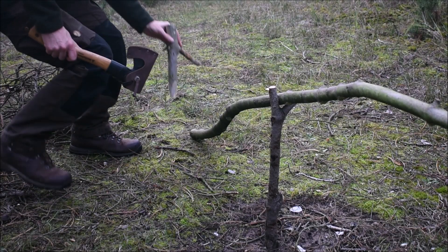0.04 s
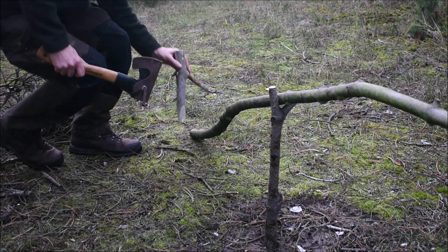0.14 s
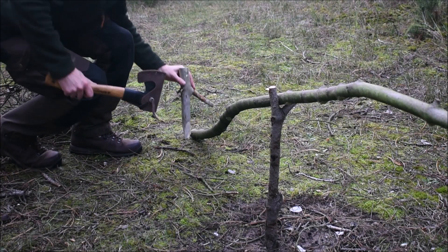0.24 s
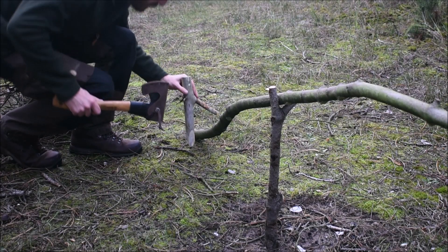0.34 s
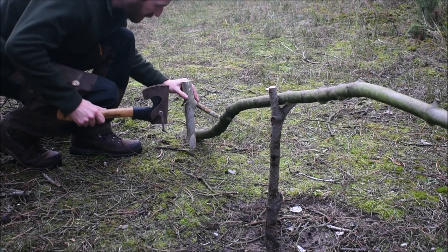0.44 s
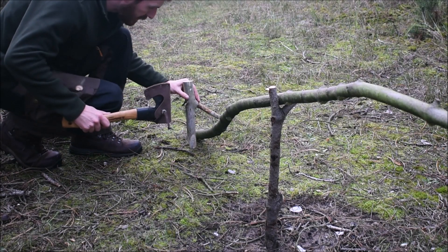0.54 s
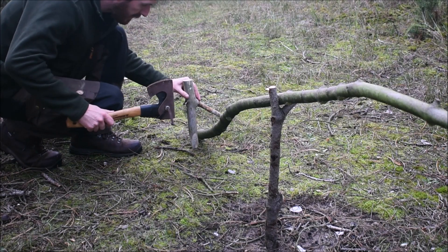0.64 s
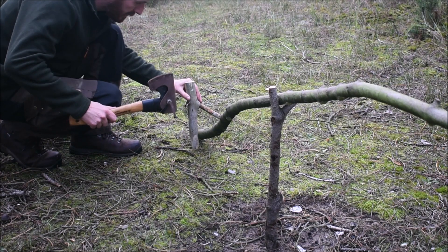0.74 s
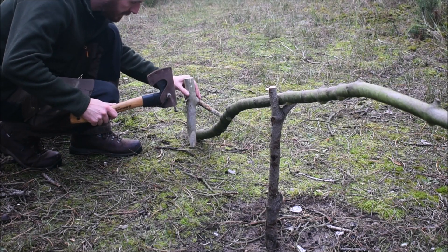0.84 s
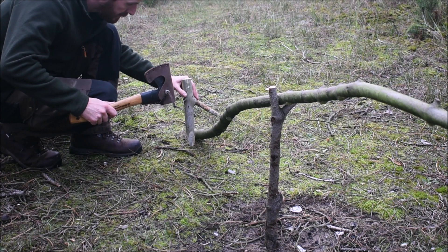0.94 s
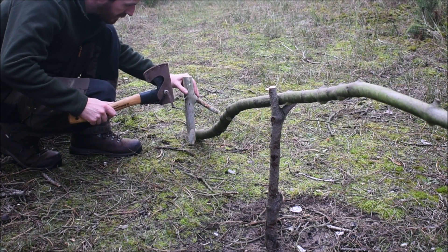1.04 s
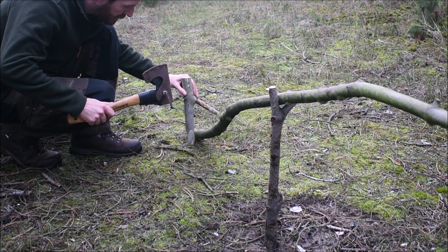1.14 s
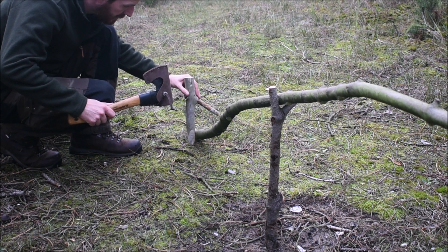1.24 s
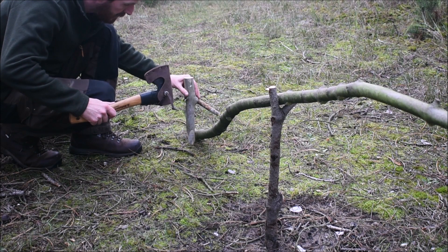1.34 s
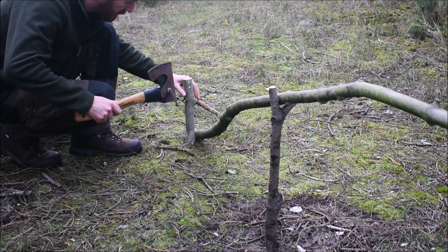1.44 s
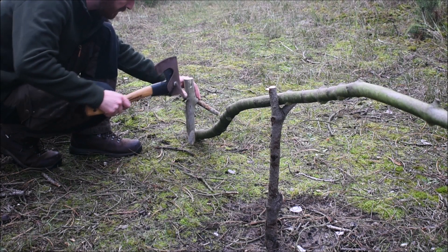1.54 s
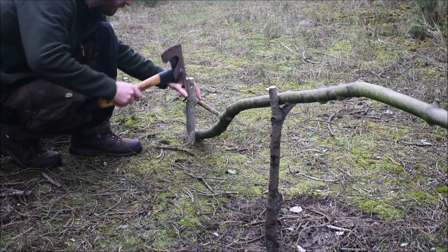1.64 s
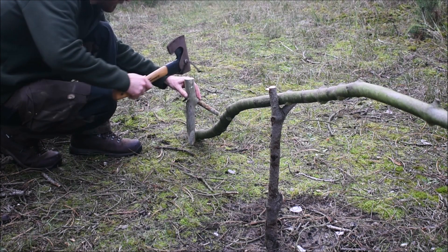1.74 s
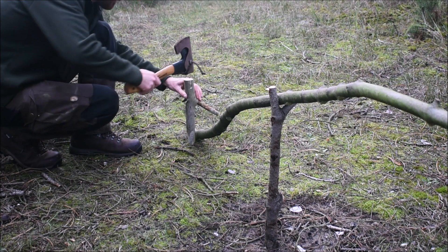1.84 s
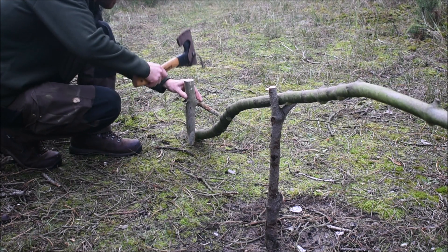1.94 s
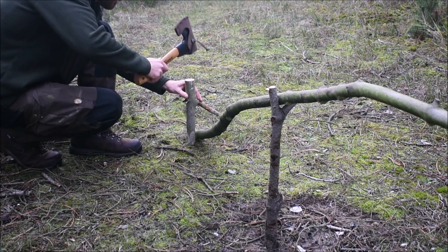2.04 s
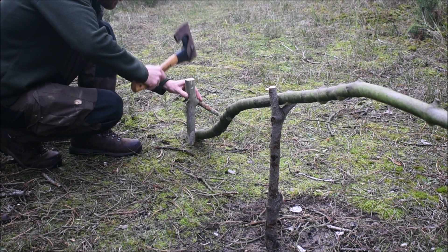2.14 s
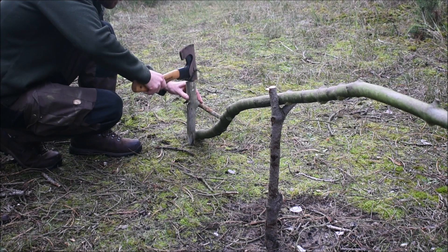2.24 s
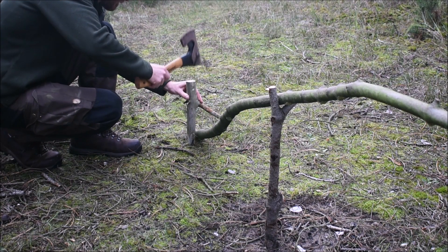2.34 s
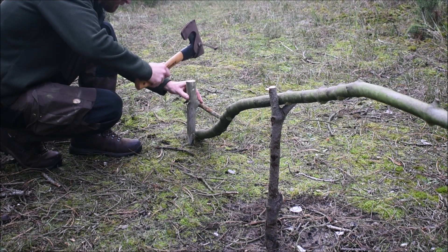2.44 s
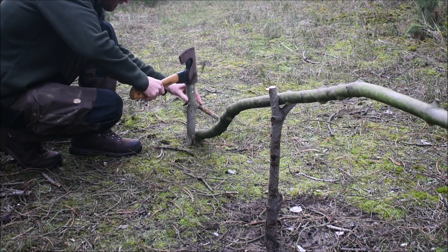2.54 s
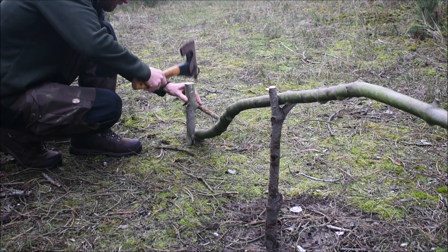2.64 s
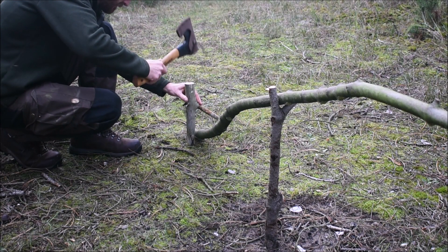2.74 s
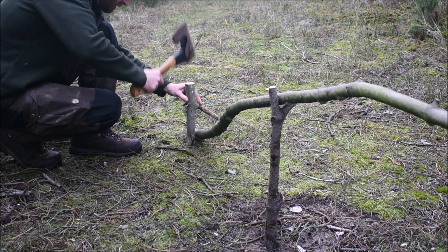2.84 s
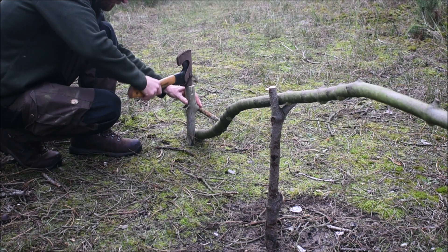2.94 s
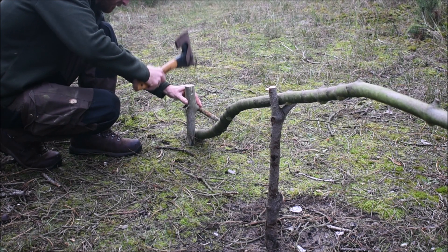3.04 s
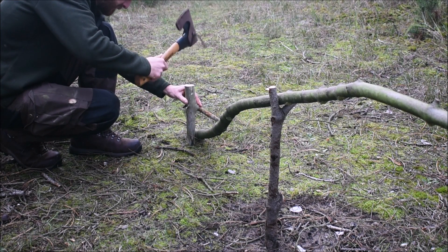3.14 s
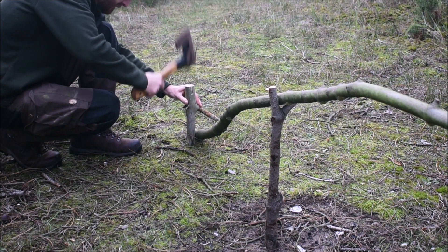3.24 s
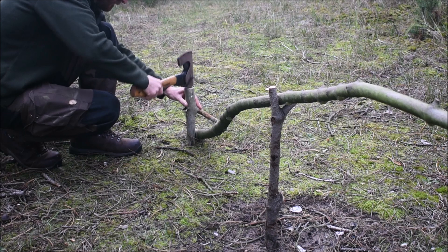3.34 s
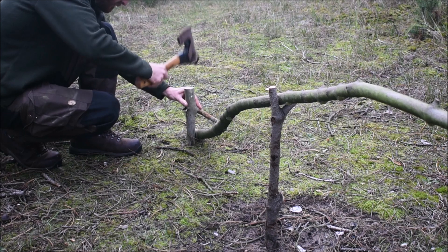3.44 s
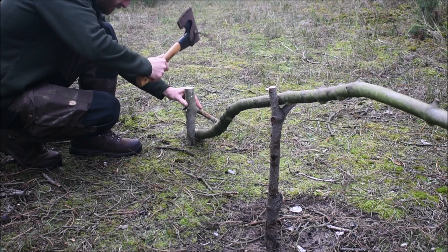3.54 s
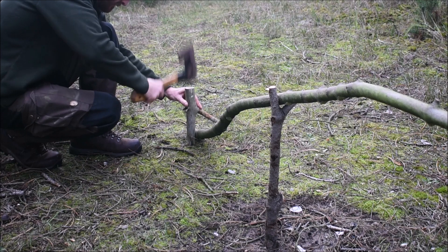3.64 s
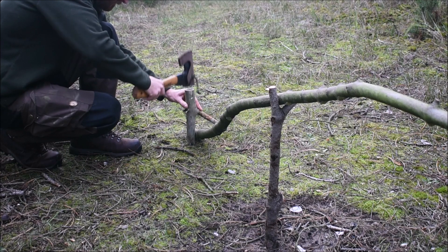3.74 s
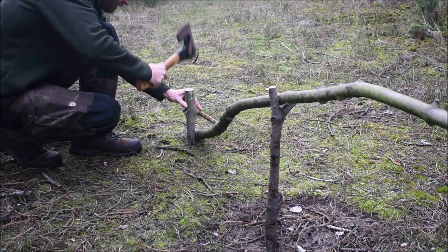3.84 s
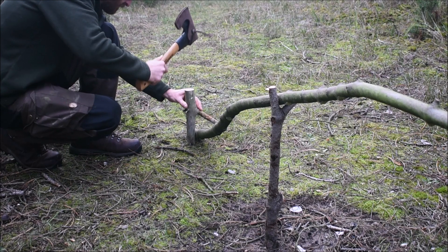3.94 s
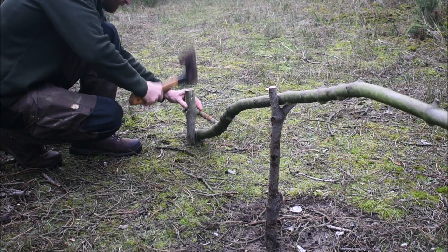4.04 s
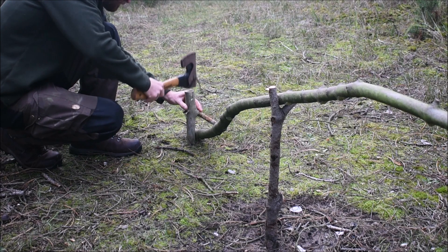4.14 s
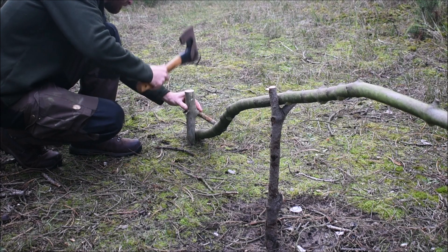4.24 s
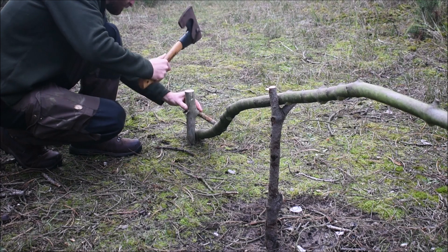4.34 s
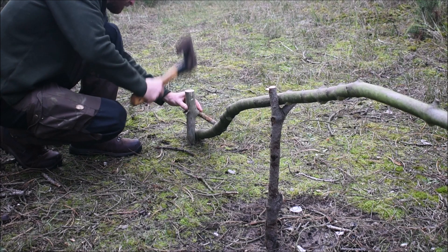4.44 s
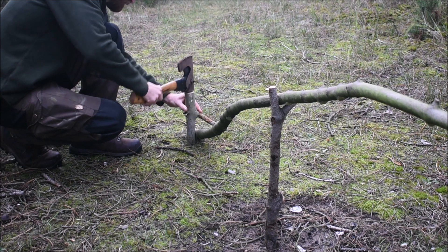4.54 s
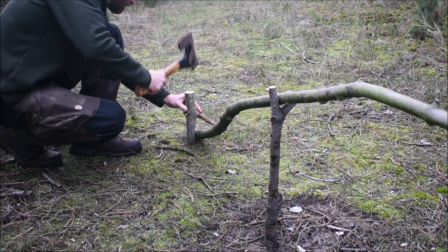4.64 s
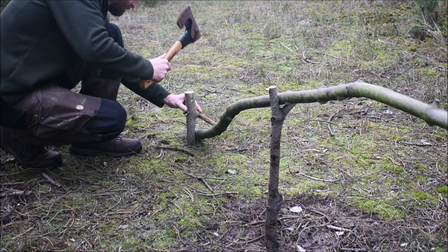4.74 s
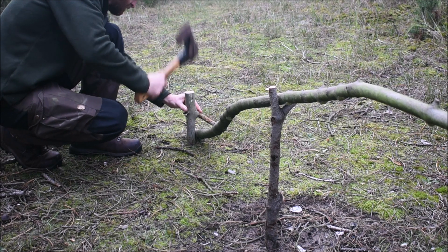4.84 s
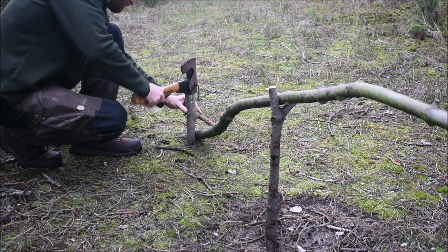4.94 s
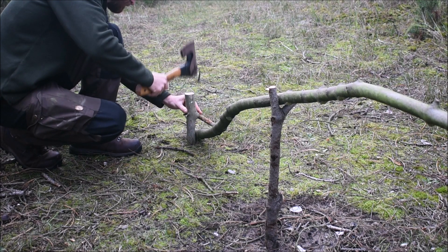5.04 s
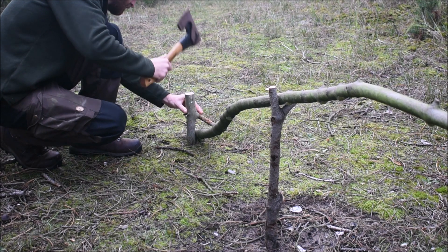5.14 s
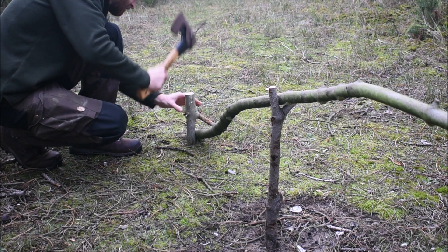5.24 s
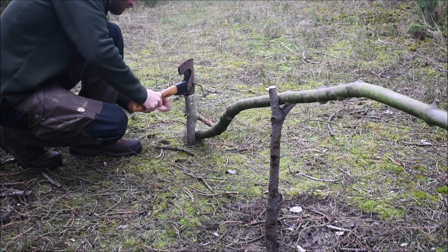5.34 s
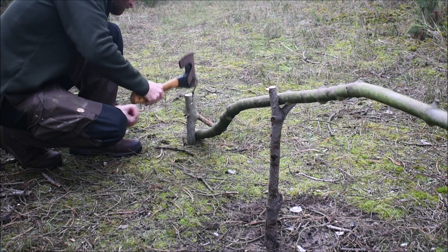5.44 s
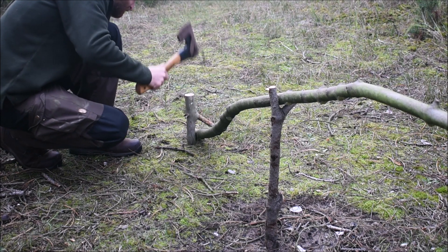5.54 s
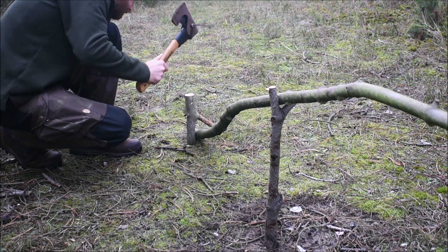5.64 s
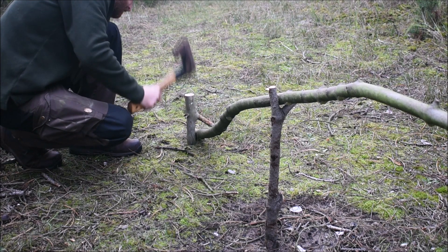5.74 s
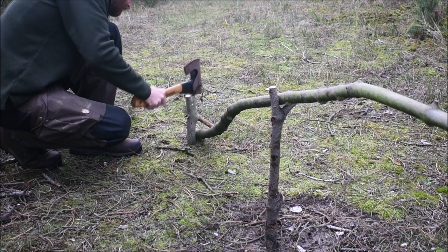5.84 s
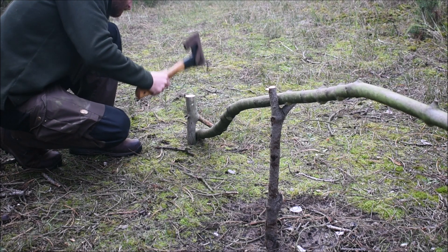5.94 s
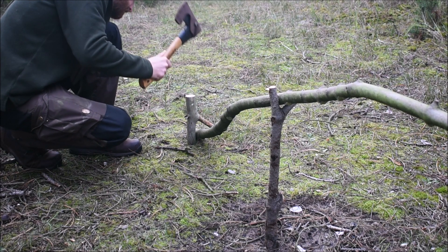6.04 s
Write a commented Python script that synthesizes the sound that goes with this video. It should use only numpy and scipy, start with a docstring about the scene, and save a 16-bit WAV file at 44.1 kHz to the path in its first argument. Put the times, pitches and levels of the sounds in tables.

```python
"""Distant wind hisses in a wood and puffs of air buffet the microphone throughout.
A crouching worker scuffs the litter, twigs tick, and a sleeve rustles as the hatchet is lifted.
From 2.2 s the hatchet drives a wooden peg into the soil: two light taps let the loose peg ring.
From 2.9 s eight dry, harder blows follow; the hardest peaks overload the input stage.
The trees scatter each knock back."""
import sys
import numpy as np
from scipy import signal
from scipy.fft import rfft, irfft, next_fast_len
from scipy.io import wavfile
from scipy.ndimage import uniform_filter1d, map_coordinates

SR = 44100
rng = np.random.default_rng(int(sys.argv[2]) if len(sys.argv) > 2 else 0)


def waveform_to_disk(signal):
    """Save audio, clipped to [-1, 1], as 16-bit WAV at the path in sys.argv[1]."""
    frames = np.transpose(np.atleast_2d(signal))
    scaled = np.clip(frames, -1, 1) * 32767
    samples = np.round(scaled).astype(np.int16)
    wavfile.write(sys.argv[1], SR, samples)


N = 269010

# Hatchet blows. Each row: start in seconds, level in dB, then low, middle, upper mode and crack gains in dB.
BLOWS = [(2.2385, -17, -2, 0.5, -8, -17.5), (2.5754, -15.5, -1, 0, -7, -13.5),
         (2.9295, -13, 1, -6.5, -4, -16.5), (3.315, -11, -2.5, -5.5, -2, -11),
         (3.6961, -10.5, -1.5, -5, 2.5, -8), (4.0941, -11, 4.5, 2.5, -1.5, -14),
         (4.5124, -10.5, 4, 1.5, -0.5, -9.5), (4.93, -15.5, -9, 5.5, 8, -5),
         (5.3533, -14, -8.5, 10, 5.5, -2.5), (5.8118, -12, 3, 3.5, -1.5, -7)]
# Peg modes. Each row: frequency in Hz, gain in dB, T60 in seconds.
HELD_MODES = [(439, -16.5, 0.033), (752, -1.5, 0.012), (1024, 0.5, 0.015), (1246, 0.5, 0.016),
              (1560, -4, 0.013), (2254, -5.5, 0.019), (2916, 1, 0.016), (3420, -7.5, 0.011),
              (4314, -7, 0.0087), (5114, -14, 0.015)]  # damped by hand and soil
LOOSE_MODES = [(916, -6.5, 0.027), (1076, -3, 0.037), (1244, 4, 0.058), (1616, -3, 0.077),
               (1780, -14, 0.15), (1946, 1, 0.044), (2167, 0.5, 0.037), (2700, -5.5, 0.039),
               (3260, -9, 0.031)]
# Free ringing of the sinking peg. Each row: time in seconds, gain in dB.
LOOSE_GAIN = [(2.24, -3.5), (2.58, -5), (2.93, -21), (5.8, -39)]
# Steel skipping on the peg. Each row: start in seconds, relative level in dB.
SKIPS = [(2.939, -33), (4.111, -24), (4.528, -27), (5.3625, -29), (5.821, -29)]
# Decay among the trees. Each row: frequency in Hz, T60 in seconds.
ECHO_T60 = [(300, 0.13), (1000, 0.21), (2500, 0.41), (6000, 0.38), (14000, 0.16)]
# Dry twigs and needles. Each row: start in seconds, relative level in dB, treble gain in dB.
TWIG_TICKS = [(0.1431, -38.5, 4), (1.0597, -42, 8), (1.464, -47, -10), (2.4014, -50, 6), (2.4723, -42, -18),
              (3.979, -43, -13), (4.807, -40, -9)]
# Air puffs. Each row: start in seconds, length in seconds, relative level in dB.
PUFFS = [(0.029, 0.18, -44.5), (.47, 0.019, -45.5), (0.818, 0.016, -39.5), (.936, 0.015, -44),
         (1.327, 0.1, -45), (1.581, 0.058, -46.5), (2.354, 0.017, -50), (2.676, 0.047, -36.5),
         (2.813, 0.022, -32), (3.138, 0.07, -43.5), (3.986, .07, -48.5), (4.072, 0.08, -35),
         (4.213, 0.16, -37.5), (4.598, 0.016, -44.5), (4.67, 0.027, -47.5), (4.731, 0.049, -39),
         (4.853, 0.092, -35.5), (5.132, 0.017, -42.5), (5.293, 0.094, -42), (5.4, .12, -52),
         (5.58, 0.028, -35.5), (5.699, .29, -39), (5.776, 0.096, -33.5)]
# Single eddies on the microphone. Each row: centre in seconds, peak in dB.
EDDY_POPS = [(0.066, -26), (0.104, -31.5), (0.824, -31), (1.429, -46.5), (2.712, -28.5), (4.080, -28),
             (4.138, -19), (4.213, -24.5), (4.361, -24.5), (4.918, -20), (5.334, -28.5), (5.780, -24.5),
             (5.848, -25.5)]
# Noise spectra. Each row: frequency in Hz, gain in dB.
CRACK_SPECTRUM = [(300, -8), (900, 3), (3000, 0.5), (5000, -3.5), (6800, -11), (8600, -6), (9400, -9),
                  (10300, -8), (12000, -15.5), (16000, -21)]
ECHO_SPECTRUM = [(150, 6), (500, 1), (1100, 2.5), (1700, -2), (2400, 0), (3800, -9), (5000, -8),
                 (6500, -17.5), (9500, -14), (15000, -29)]
SLAP_SPECTRUM = [(100, -33), (400, -16), (850, 5), (1350, -3), (2200, 2), (4000, -26), (9000, -71)]
SLOW_AIR_SPECTRUM = [(20, -41), (45, -5.5), (75, 0), (115, -6.5), (180, -11), (300, -20), (600, -57),
                     (1200, -120)]
FAST_AIR_SPECTRUM = [(20, -27), (60, 6), (110, 4), (200, -8), (300, -12), (450, -20), (800, -42),
                     (1500, -120)]
LITTER_SPECTRUM = [(1500, -7), (3500, -2.5), (8000, 2), (13000, -1), (16000, -7)]
SLEEVE_SPECTRUM = [(2000, -13), (5500, 1), (8500, -3), (11000, -11), (16000, -16)]
FOREST_SPECTRUM = [(25, -5), (60, -7), (120, -21), (250, -8.5), (420, -2), (800, -1), (1200, -5.5),
                   (2000, -12), (4000, -22), (8000, -28), (13500, -33), (16000, -43)]


def hatchet(jolt_hz=2020, thud_hz=230, firming_db_per_s=5.5, rebound_s=0.0039, rebound_db=-18):
    """Steel crushes the peg's head, rings the wood and pushes the soil; the trees answer."""
    out, t = np.zeros(N), np.arange(SR // 8) / SR
    for start_s, db, low_db, middle_db, upper_db, crack_db in BLOWS:
        held = amp(1) * peg_ring(HELD_MODES, t, low_db, middle_db, upper_db, scatter_db=1.1, detune=0.011)
        loose_db = 4 + np.interp(start_s, *np.transpose(LOOSE_GAIN))
        loose = amp(loose_db) * burst(peg_ring(LOOSE_MODES, t, 0, 0, 0, scatter_db=0.7, detune=0.0015))
        # pressure kick of the stopping head
        jolt = amp(2 + upper_db / 2) * np.sin(2 * np.pi * jolt_hz * t) * decay(t, 0.0058)
        # fibres give way as the force builds, then crackle
        force = 1 - np.exp(-(t / 0.00042) ** 2)
        crush = force * (decay(t, 0.01) + amp(-20) * decay(t, 0.034))
        crack = amp(crack_db + 7) * burst(noise(CRACK_SPECTRUM, len(t)) * crush)
        # soil firms up as the peg sinks
        thud_db = -31 + firming_db_per_s * (start_s - BLOWS[0][0])
        thud = amp(thud_db) * burst(np.sin(2 * np.pi * thud_hz * t) * t * decay(t, 0.018))
        add(out, start_s, amp(db) * (held + loose + jolt + crack + thud))
        add(out, start_s + rebound_s, amp(db + rebound_db) * held)  # peg springs back against the steel
        echo_db = db - 20 + 0.28 * upper_db  # sharper blows carry farther
        add(out, start_s, amp(echo_db) * tree_echo(SR // 3, bright_db=crack_db + 7))
    for start_s, db in SKIPS:
        add(out, start_s, amp(db - 15) * burst(noise(CRACK_SPECTRUM, len(t)) * decay(t, 0.0051)))
    return out


def peg_ring(modes, t, low_db, middle_db, upper_db, scatter_db, detune, rise_s=0.00019):
    """Damped modes; each blow lands elsewhere and shifts their strength and pitch."""
    hz, db, t60_s = np.transpose(modes)
    level_draw, pitch_draw = rng.standard_normal((len(hz), 2)).T
    band_gains = [(850, low_db), (1250, 0), (1520, middle_db), (2100, middle_db), (2800, upper_db)]
    db = db + scatter_db * level_draw + log_interp(band_gains, hz)
    hz = hz * (1 + detune * pitch_draw)
    phase_rad = np.arange(len(hz)) * np.pi / 2
    swing = np.sin(2 * np.pi * hz[:, None] * t + phase_rad[:, None])
    return amp(db) @ (decay(t, t60_s[:, None]) * swing) * (1 - np.exp(-t / rise_s))


def tree_echo(size, bright_db, delay_s=0.015, rise_s=0.011, slap_s=0.032):
    """Trunks and brush scatter a knock back: a diffuse swell with one dull slap."""
    t = np.arange(size) / SR
    trunks = clumps(size, spread_db=2, window_samples=70)
    hz, frame_s, stft = signal.stft(rng.standard_normal(size) * trunks, SR, nperseg=256)
    colour_db = log_interp(ECHO_SPECTRUM, hz) + log_interp([(1400, 0), (7000, bright_db)], hz)
    gain = amp(colour_db[:, None]) * decay(frame_s, log_interp(ECHO_T60, hz)[:, None])
    scatter = signal.istft(stft * gain, SR, nperseg=256)[1][:size] * np.minimum(t / rise_s, 1)
    slap = amp(-7.5) * noise(SLAP_SPECTRUM, size) * swell(t + delay_s, slap_s, width_s=0.0036)
    return np.pad(scatter + slap, (round(delay_s * SR), 0))


def buffeting(eddy_s=0.00097):
    """Air tumbles over the microphone; faster puffs are louder and shed smaller eddies."""
    db = draught_db()
    fast_share = np.clip((db + 48) / 18, 0, 1)
    slow = np.sqrt(1 - fast_share) * noise(SLOW_AIR_SPECTRUM, N)
    fast = np.sqrt(fast_share) * noise(FAST_AIR_SPECTRUM, N)
    air = slow + fast
    local_power = np.abs(uniform_filter1d(air ** 2, size=1500))
    out = amp(db) * air / np.sqrt(local_power + 0.43)  # each puff keeps its own strength
    t = np.arange(-SR // 50, SR // 50) / SR
    u = t / eddy_s
    eddy = (1 - u ** 2 / 2) * np.exp(-u ** 2 / 4)  # pressure peak between two dips
    for centre_s, peak_db in EDDY_POPS:
        add(out, centre_s + t[0], amp(peak_db) * eddy)
    return out


def draught_db(calm_db=-62.5, rise_s=0.0045, fall_s=0.009, flutter_db=4.5, flutter_hz=22.23):
    """Air strength: puffs rise, hold and fall over a calm, all of it fluttering."""
    t, power = np.arange(N) / SR, amp(calm_db) ** 2
    for start_s, length_s, db in PUFFS:
        extra_s = 0.058 * length_s  # longer puffs have slower edges
        early = np.maximum(start_s - t, 0) / (rise_s + extra_s)
        late = np.maximum(t - start_s - length_s, 0) / (fall_s + extra_s)
        power = power + (amp(db) * np.exp(-early - late)) ** 2
    flutter = map_coordinates(rng.standard_normal(N // 100), [np.arange(N) * flutter_hz / SR])
    return 10 * np.log10(power) + flutter_db * flutter


def twigs():
    """Dry twigs and needles tick one by one."""
    out, t = np.zeros(N), np.arange(SR // 20) / SR
    snap = decay(t, 0.011) + amp(-8) * decay(t, 0.025)
    for start_s, db, treble_db in TWIG_TICKS:
        twig = equalize(noise(LITTER_SPECTRUM, len(t)), [(6000, 0), (13000, treble_db)])
        add(out, start_s, amp(db - 10) * burst(twig * snap))
    return out


def litter(scuff_db=-54.5, settle_db=-65, settle_db_per_s=19):
    """A boot scuffs the needles, which then settle."""
    t = np.arange(N) / SR
    grains = clumps(N, spread_db=2.2, window_samples=90)
    scuff = amp(scuff_db) * swell(t, centre_s=0.176, width_s=0.014)
    settle = amp(settle_db - settle_db_per_s * t)
    return (scuff + settle) * unit_rms(grains * noise(LITTER_SPECTRUM, N))


def sleeve(level_db=-64.5):
    """Cloth brushes on cloth as the arm first lifts the hatchet."""
    lift = swell(np.arange(N) / SR, centre_s=1.72, width_s=0.093)
    return amp(level_db) * lift * noise(SLEEVE_SPECTRUM, N)


def forest_wind(level_db=-52.5):
    """Steady, distant wind in the treetops."""
    return amp(level_db) * noise(FOREST_SPECTRUM, N)


def amp(db):
    return 10 ** (np.asarray(db) / 20)


def decay(t, t60_s):
    return amp(-60 * t / t60_s)


def swell(t, centre_s, width_s):
    return np.exp(-((t - centre_s) / width_s) ** 2)


def unit_rms(x):
    return x / np.sqrt(np.mean(x ** 2) + 1e-20)


def burst(x):
    """Scale to the energy of 2 ms at rms 1."""
    return x / np.sqrt(np.sum(x ** 2) / (0.002 * SR) + 1e-20)


def log_interp(points, hz):
    points_hz, values = np.transpose(points)
    return np.interp(np.log(hz + 1), np.log(points_hz + 1), values)


def filtered(x, gain_at_hz):
    size = next_fast_len(len(x) + SR // 10)
    return irfft(rfft(x, size) * gain_at_hz(np.fft.rfftfreq(size, 1 / SR)), size)[:len(x)]


def equalize(x, spectrum):
    return filtered(x, lambda hz: amp(log_interp(spectrum, hz)))


def noise(spectrum, size):
    return unit_rms(equalize(rng.standard_normal(size), spectrum))


def clumps(size, spread_db, window_samples):
    """Grainy random gain."""
    return amp(spread_db * unit_rms(uniform_filter1d(rng.standard_normal(size), window_samples)))


def add(track, start_s, sound):
    part = track[max(round(start_s * SR), 0):][:len(sound)]
    part += sound[:len(part)]


def scene():
    """Knocks, the worker's small noises and the air, in mono."""
    return (hatchet() + twigs() + litter() + sleeve() + buffeting() + forest_wind())[None]


def record(dry):
    """The input stage flattens the hardest peaks; a steep low-pass follows."""
    ceiling, cutoff_hz = 0.54, 16000
    clipped = dry[0] / (1 + np.abs(dry[0] / ceiling) ** 8) ** (1 / 8)
    return filtered(clipped, lambda hz: 1 / np.sqrt(1 + (hz / cutoff_hz) ** 140))[None]


dry = scene()
out = record(dry)
waveform_to_disk(out)
```